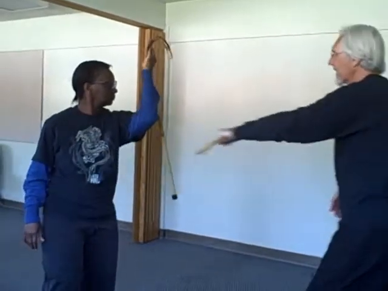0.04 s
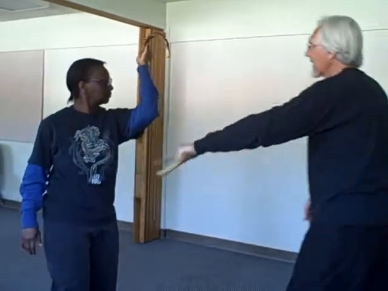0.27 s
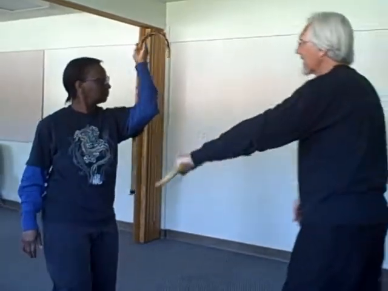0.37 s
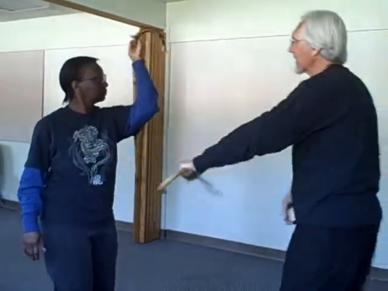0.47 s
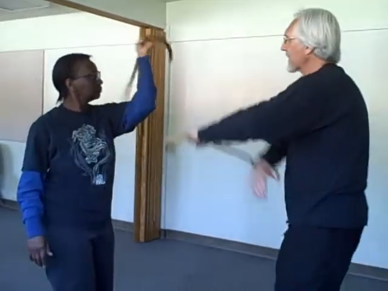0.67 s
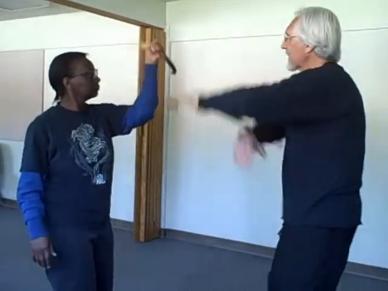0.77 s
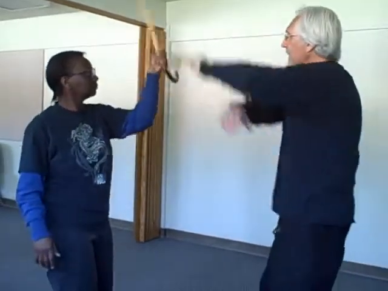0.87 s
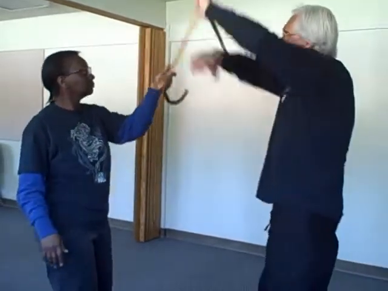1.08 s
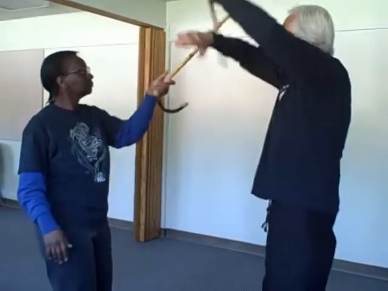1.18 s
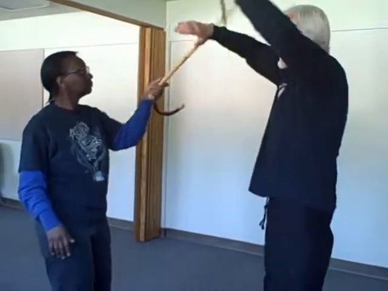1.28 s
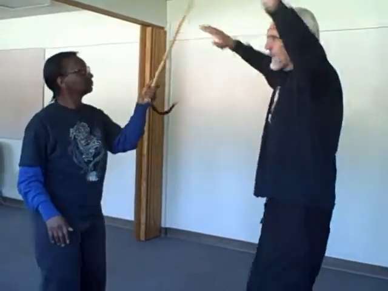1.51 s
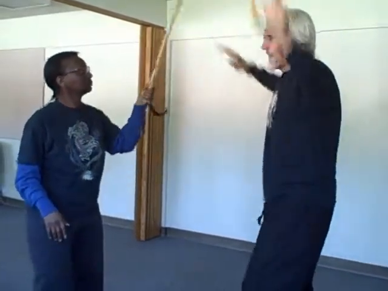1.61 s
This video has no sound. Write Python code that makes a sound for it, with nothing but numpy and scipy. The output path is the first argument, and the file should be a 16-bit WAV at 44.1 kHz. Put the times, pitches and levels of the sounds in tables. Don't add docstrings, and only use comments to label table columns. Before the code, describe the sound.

Hard wooden stick strikes crack and ring in a live room over low ventilation rumble.

```python
import sys
import numpy as np
from scipy import signal
from scipy.fft import rfft, irfft
from scipy.io import wavfile
from scipy.ndimage import uniform_filter1d

SR = 44100
rng = np.random.default_rng(int(sys.argv[2]) if len(sys.argv) > 2 else 0)


def voltage_ratio(decibels):
    exponent = np.asarray(decibels, float) / 20
    return 10 ** exponent


def master_out(mix):
    frames = np.transpose(np.atleast_2d(mix))
    ceiling = np.clip(frames, -1, 1)
    pcm = np.round(ceiling * 32767).astype(np.int16)
    wavfile.write(sys.argv[1], SR, pcm)


N = 72765

# f/Hz, level per Hz/dB
AIR_SHAPE = [(12, -21), (20, 2.5), (65, -5), (127, -11.5), (163, -15), (319, -21), (472, -27.5), (590, -33),
             (16000, -53)]
AIR_DB = -41
FAN_HZ, FAN_WIDTH_HZ, FAN_WANDER, FAN_DB = 164.1, 27.5, 0.049, -51

# t/s, length/s, level/dB
SWISHES = [
    (0.14, 0.082, -70),
    (0.642, 0.25, -58.5),
    (0.998, 0.18, -95.5),
]
SWISH_HZ, SWISH_WIDTH_HZ = 696, 860

# t/s, level/dB, f/Hz, time to fall 60 dB/s
THUDS = [
    (0.289, -40, 40, 0.16),
    (.5, -40, 54.2, .2),
    (.63, -30.5, 26.3, 0.4),
    (0.831, -43, 52.8, .2),
    (1.335, -37, 68.5, 0.18),
    (1.334, -38, 128, 0.35),
    (1.359, -35, 93.3, 0.5),
    (1.529, -47.5, 150, 0.15),
    (1.57, -42, 100, 0.21),
]
THUD_PUSH_S, THUD_ROUGH = 0.05, 0.66

# f/Hz, time to fall 60 dB/s, level/dB
TAIL = [(407.6, 0.28, -1.5), (800, 0.27, -7.5), (1097, 0.59, -21), (1500, 0.4, -11), (2500, 0.54, -11),
        (3900, 0.46, -15), (7000, 0.51, -19.5), (11840, 0.36, -17)]
TAIL_BUILD_S = 0.00347

# t/s, level/dB
TICKS = [
    (.158, -55.5),
    (.657, -77.5),
    (0.836, -62),
    (0.944, -70),
    (1.5656, -41),
]

# t/s, level/dB, grip number, lowest contact f/Hz, highest contact f/Hz
BLOWS = [
    (0.2199, -3, 0, 150, 16000),
    (1.1831, -4, 1, 150, 16000),
    (1.1965, -14.5, 1, 1500, 7000),
    (1.224, -16, 1, 1730, 4450),
    (1.2892, -5, 2, 150, 16000),
    (1.302, -14, 2, 1180, 8800),
]
FIRST_TONES = [400, 545, 780, 1001, 1600, 1952, 2460, 3205, 3752, 4414, 4737, 5324, 5787, 7290]
SECOND_TONES = [330, 540, 716, 994, 1520, 1636, 2110, 2444, 2850, 3203, 4430, 5200, 6444, 8100]
THIRD_TONES = [420, 545, 754, 985, 1375, 1632, 2109, 2402, 2895, 3284, 3671, 4151, 5976, 7585]
# width/Hz, level/dB
RINGS = [
    [(35, -16), (35, -12), (40, -15), (30, 0), (199, -10.5), (110, -3), (70, 1), (110, -2.5), (69, 4.5),
     (250, -11.5), (122.1, -9), (120, -16), (120, -5), (250, -23)],
    [(50.4, -15), (50, -16.5), (45.5, -5), (36, 2.5), (150, -3.5), (121, -3.5), (79.4, 3.5), (100, -4),
     (150, 0), (120, -3.5), (250, -3.5), (250, -15), (130, -5.5), (250, -23)],
    [(40, -22), (40, -22), (40, -7.5), (35, -3.5), (204, -3), (130, 0.5), (90, 1), (110, -2), (109, 0),
     (110, -2.5), (150, -10), (200, -8), (199, -12.5), (250, -14)],
]
# f/Hz, level per Hz/dB
CRACKS = [
    [(300, -29), (900, -13), (1800, -1.5), (3000, -3.5), (5500, -4), (9000, -16.5), (16000, -30)],
    [(300, -29.5), (900, -6.5), (1800, -0.5), (3000, 0), (5500, -4.5), (9000, -15), (16000, -25)],
    [(300, -26), (900, -10), (1800, -2.5), (3000, -1), (5500, -2.5), (9000, -15), (16000, -26)],
]
# delay/s, level/dB
ECHOES = [
    [(.0012, -4), (.0049, 2.5), (.0146, -4.5), (.027, -9.5), (.041, -14)],
    [(.0012, -9), (.0052, -5.5), (.0090, -3), (.019, -7.5), (.029, -12.5)],
    [(.0022, -1.5), (.0052, 0.5), (.0103, -8.5), (.0185, -10), (.029, -16)],
]
HALL_DB = [8.5, 7, 9.5]
CHATTER_RISE_S, CHATTER_FALL_S = 0.00043, 0.003
SPREAD_S = 0.0018
CRACK_DB, ECHO_RING_DB, RING_TO_HALL_DB = -5.5, -10, -9.5
ATTACK_TOP_HZ, TOP_HZ = 16600, 15750


def level(x, db):
    return x * voltage_ratio(db) / np.sqrt(np.mean(x ** 2))


def band(x, hz, width_hz):
    return signal.lfilter(*signal.iirpeak(min(hz, .45 * SR), hz / width_hz, fs=SR), x)


def walk(rate_hz):
    k = int(SR / rate_hz)
    steps = np.repeat(rng.standard_normal(N // k + 1), k)
    return 0.49 * uniform_filter1d(uniform_filter1d(steps, k), k)[:N]


def add(out, x, at_s):
    i = int(at_s * SR)
    out[i:i + len(x)] += x[:N - i]


def colour(x, shape):
    hz, db = np.array(shape).T
    f = np.maximum(np.arange(513) * SR / 1024, 20)
    curve_db = np.interp(np.log(f), np.log(hz), db, left=db[0] - 15)
    cepstrum = irfft(np.log(voltage_ratio(curve_db)))
    cepstrum[1:512] *= 2
    cepstrum[513:] = 0
    return signal.fftconvolve(x, irfft(np.exp(rfft(cepstrum))))[:len(x)]


def cut(x, hz):
    return signal.sosfilt(signal.ellip(8, .2, 50, hz, fs=SR, output="sos"), x)


def air():
    f = np.maximum(np.arange(N // 2 + 1) * SR / N, 10)
    hz, db = np.array(AIR_SHAPE).T
    shape = voltage_ratio(np.interp(np.log(f), np.log(hz), db))
    noise = level(irfft(rfft(rng.standard_normal(N)) * shape, N), AIR_DB)
    bass = signal.sosfilt(signal.butter(2, 130, fs=SR, output="sos"), noise)
    flicker = bass * (voltage_ratio(0.68 * walk(3.6)) - 1)

    rough = band(band(rng.standard_normal(N), FAN_HZ, FAN_WIDTH_HZ), FAN_HZ, 3 * FAN_WIDTH_HZ)
    loudness = voltage_ratio(7 * walk(14))
    turns = np.cumsum(FAN_HZ * (1 + FAN_WANDER * walk(7))) / SR
    hum = level(rough, -1.5) + loudness * np.sin(2 * np.pi * turns)
    octave = band(hum ** 2, 2 * FAN_HZ, 30)
    return noise + flicker + level(hum, FAN_DB) + level(octave, -68.5)


def sleeves():
    t = np.arange(N) / SR
    swell = sum(voltage_ratio(db) * np.exp(-((t - s) / (long / 2)) ** 2) for s, long, db in SWISHES)
    cloth = level(band(rng.standard_normal(N), SWISH_HZ, SWISH_WIDTH_HZ), 0)
    return swell * voltage_ratio(2.5 * walk(40)) * cloth


def feet():
    out, t = np.zeros(N), np.arange(SR // 2) / SR
    for s, db, hz, t60 in THUDS:
        push = 1 - np.exp(-(t / THUD_PUSH_S) ** 2)
        env = push * voltage_ratio(-60 * t / t60)
        wobble = np.cumsum(1 + THUD_ROUGH * .3 * walk(32.3)[:len(t)]) / SR
        add(out, voltage_ratio(db) * env / env.max() * np.sin(2 * np.pi * hz * wobble), s)
    return out


def hall(x):
    t = np.arange(SR * 3 // 4) / SR
    hz, t60, db = np.array(TAIL).T
    tail = np.zeros(len(t))
    for f in 280 * 2 ** np.arange(0, 6, 1 / 3):
        band_t60 = np.interp(np.log(f), np.log(hz), t60)
        band_db = np.interp(np.log(f), np.log(hz), db)
        noise = band(band(rng.standard_normal(len(t)), f, f / 3), f, f / 3)
        tail += voltage_ratio(band_db - 16 - 60 * t / band_t60) * noise
    build = 1 - np.exp(-(t / TAIL_BUILD_S) ** 2)
    return signal.fftconvolve(x, tail * build)[:N]


def ticks():
    out, t = np.zeros(N), np.arange(512) / SR
    for s, db in TICKS:
        grit = rng.standard_normal(len(t)) * np.exp(-t / 0.0017)
        add(out, voltage_ratio(db) * band(band(grit, 5500, 5370), 4900, 6000), s)
    return out


def wood_ring(click, grip, lags, rise):
    ring = np.zeros(len(click))
    tones = (FIRST_TONES, SECOND_TONES, THIRD_TONES)[grip]
    for hz, (width_hz, db), lag in zip(tones, RINGS[grip], lags):
        late_click = np.pad(click, (lag, 0))[:len(click)]
        ring += voltage_ratio(db) * band(late_click, hz, width_hz)
    ring *= rise
    return ring / np.abs(ring).max()


def canes():
    near, sent = np.zeros(N), np.zeros((len(RINGS), N))
    t = np.arange(4096) / SR
    rise = 1 - np.exp(-t / CHATTER_RISE_S)
    chatter = rise * np.exp(-t / CHATTER_FALL_S)
    for s, db, grip, low_hz, top_hz in BLOWS:
        g = int(round(grip))
        grit = rng.standard_normal((len(ECHOES[0]) + 1, len(t)))
        contact = signal.butter(2, [low_hz, min(top_hz, .45 * SR)], "band", fs=SR)
        click = signal.lfilter(*contact, (t == 0) * 1.)
        lags = (np.abs(np.tanh(grit[0, -len(FIRST_TONES):])) * SPREAD_S * SR).astype(int)
        ring = voltage_ratio(db) * wood_ring(click, g, lags, rise)

        cracks = [colour(signal.lfilter(*contact, row * chatter), CRACKS[g]) for row in grit]
        cracks = [voltage_ratio(db + CRACK_DB) * c / np.abs(c).max() for c in cracks]
        add(near, ring + cracks[0], s)
        for (delay_s, echo_db), crack in zip(ECHOES[g], cracks[1:]):
            add(near, voltage_ratio(echo_db) * (crack + voltage_ratio(ECHO_RING_DB) * ring), s + delay_s)

        broad = colour(click, CRACKS[g])
        broad = voltage_ratio(db + HALL_DB[g]) * broad / np.sqrt(np.sum(broad ** 2))
        add(sent[g], broad + voltage_ratio(RING_TO_HALL_DB) * ring, s)
    return near, sent


def scene():
    near, sent = canes()
    small = ticks()
    room = sum(hall(x) for x in sent) + hall(small)
    quiet = air() + sleeves() + feet() + room + small
    return (cut(near, ATTACK_TOP_HZ) + cut(quiet, TOP_HZ))[None]


def band_limit(x):
    return signal.sosfilt(signal.butter(12, 16860, fs=SR, output="sos"), x)


def record(dry):
    return band_limit(dry)


dry = scene()
out = record(dry)
master_out(out)
```